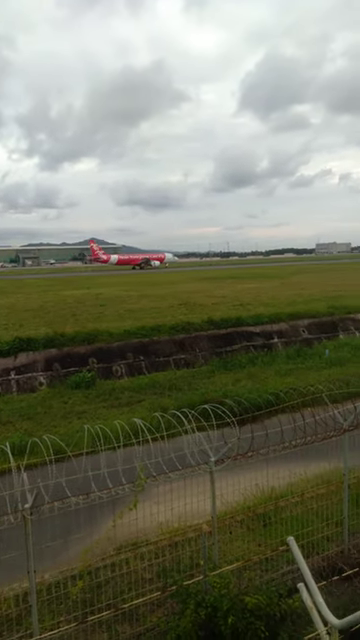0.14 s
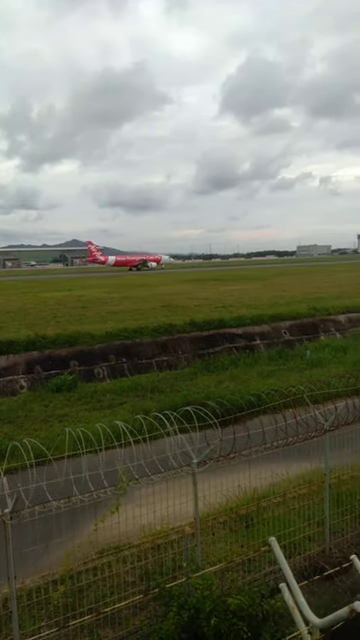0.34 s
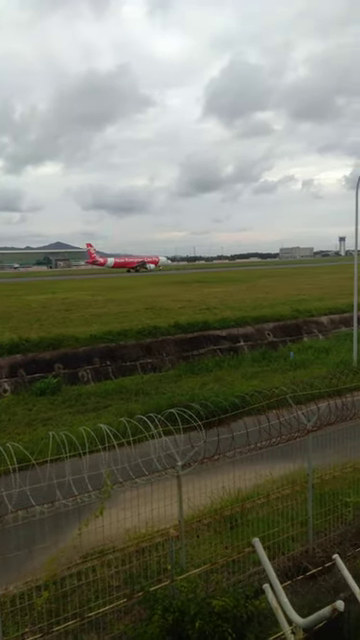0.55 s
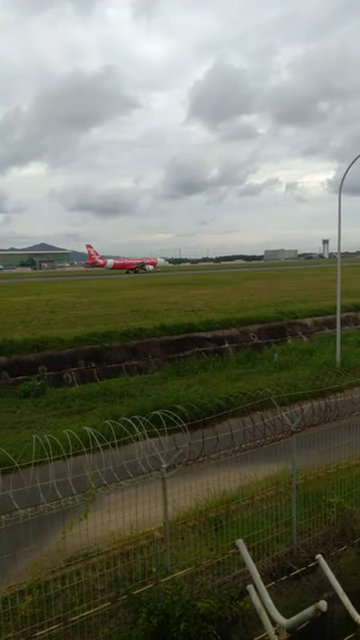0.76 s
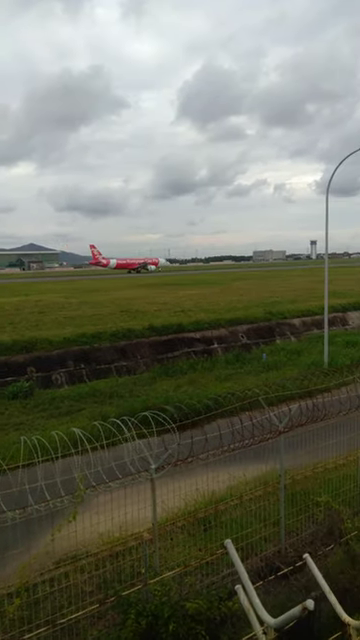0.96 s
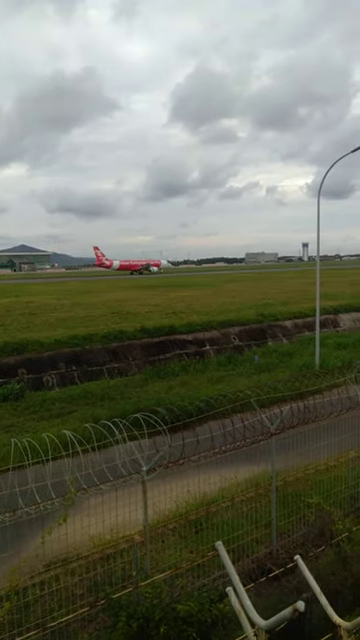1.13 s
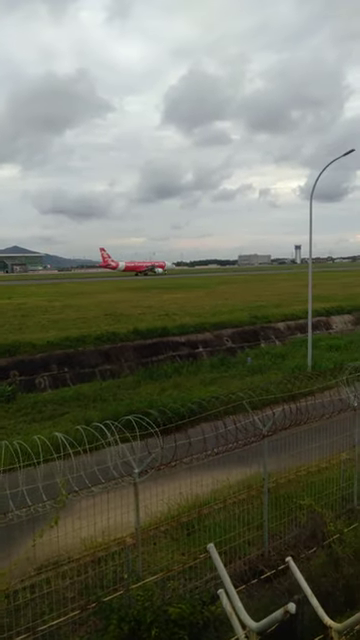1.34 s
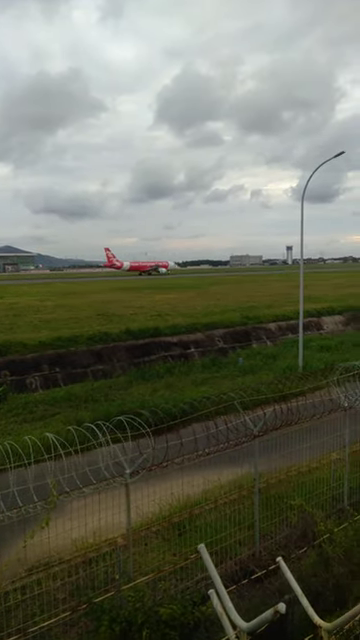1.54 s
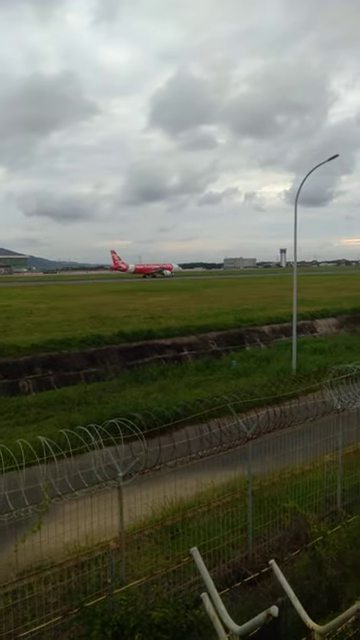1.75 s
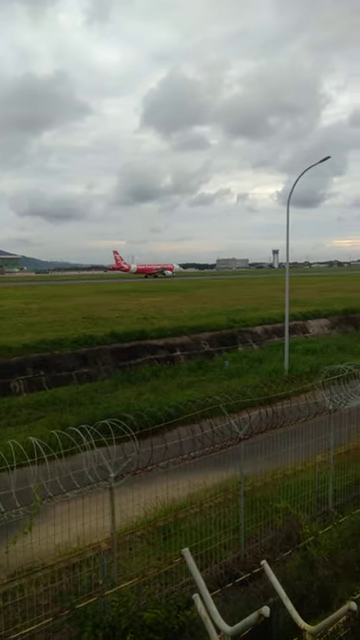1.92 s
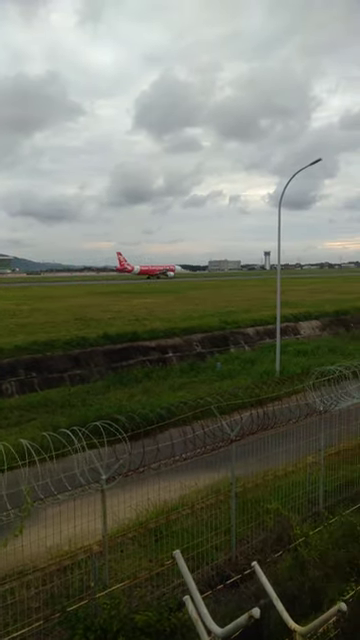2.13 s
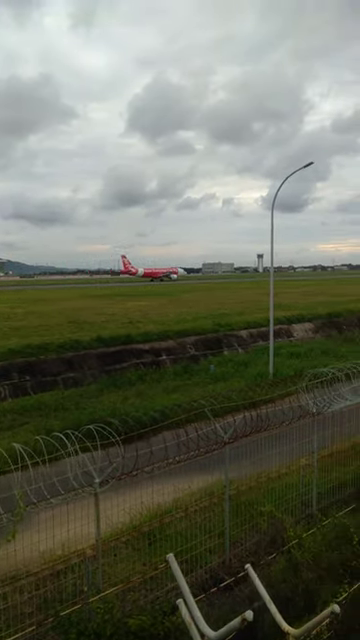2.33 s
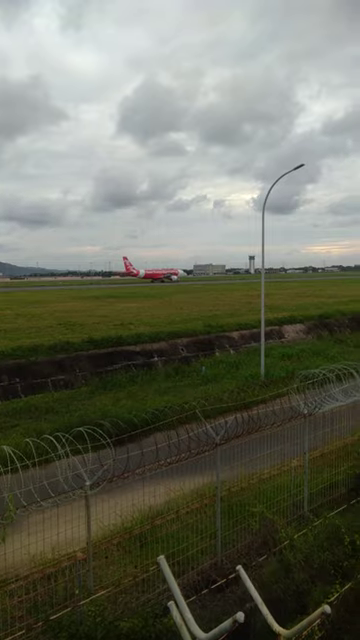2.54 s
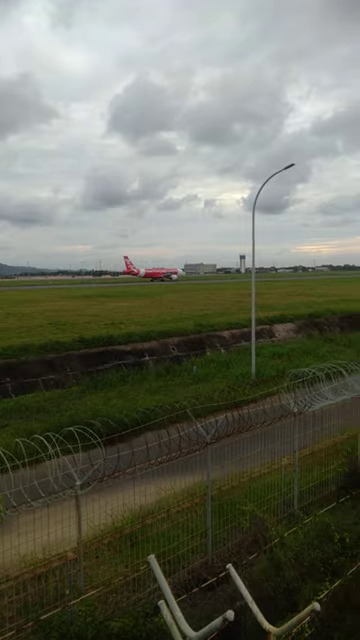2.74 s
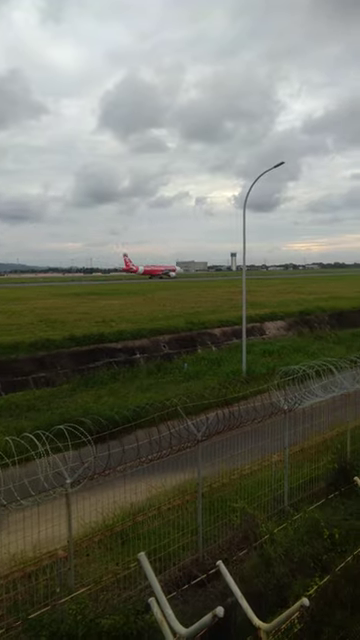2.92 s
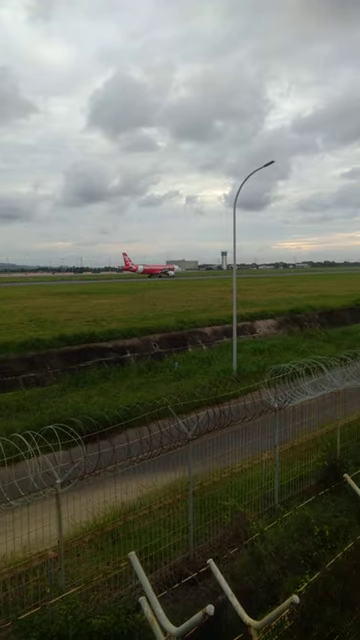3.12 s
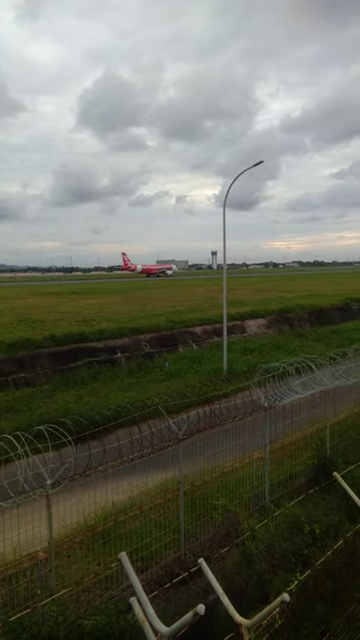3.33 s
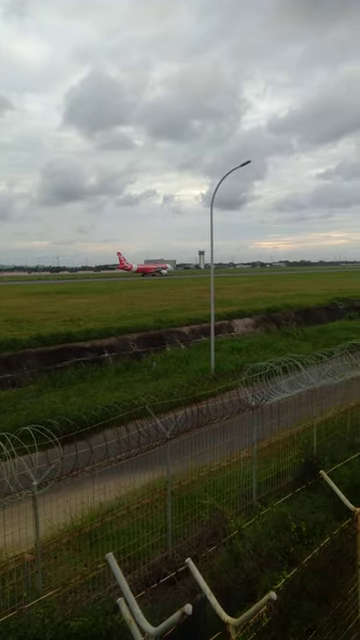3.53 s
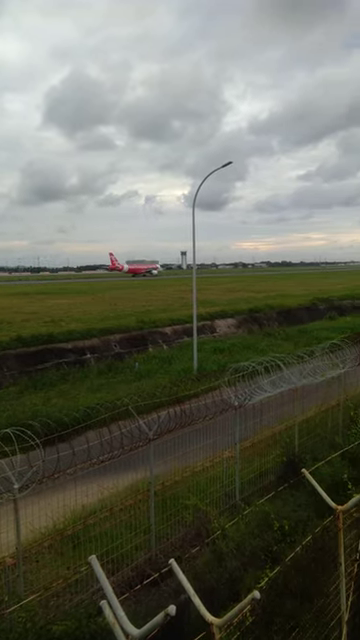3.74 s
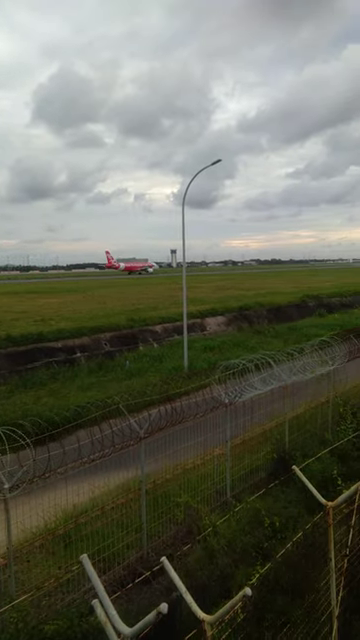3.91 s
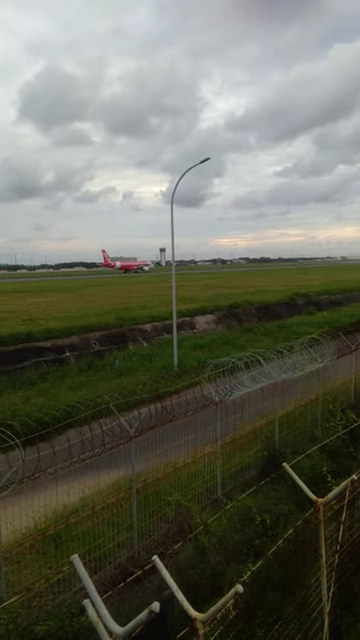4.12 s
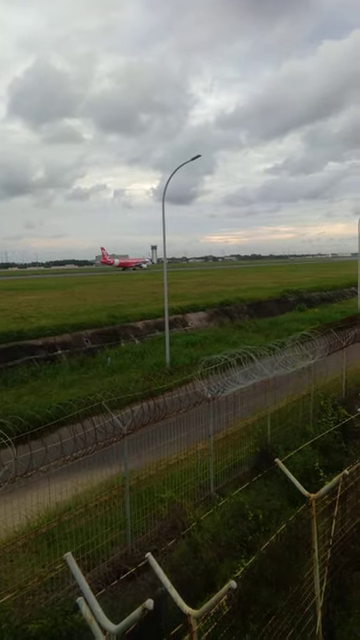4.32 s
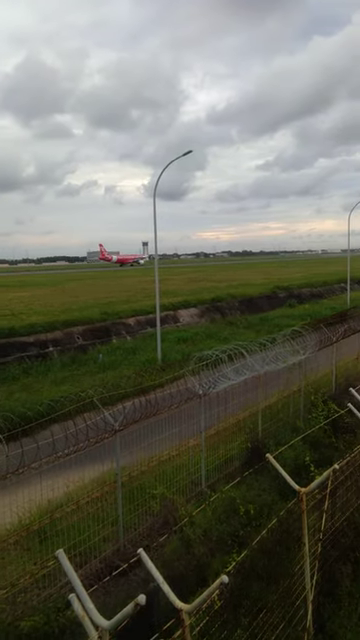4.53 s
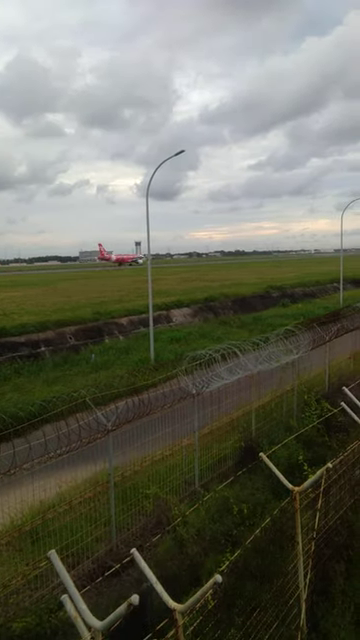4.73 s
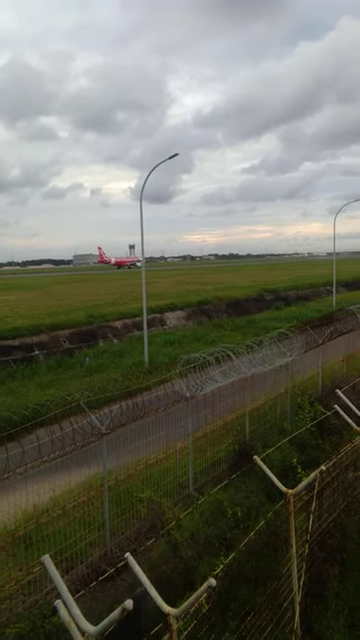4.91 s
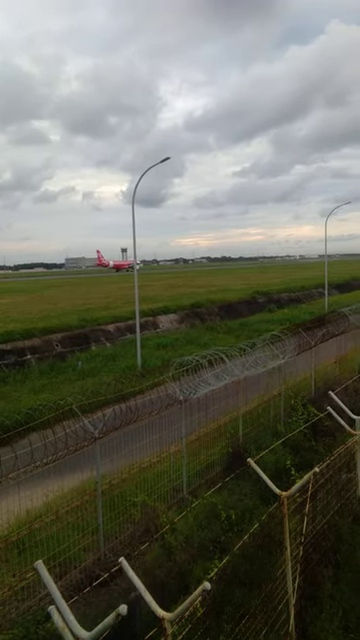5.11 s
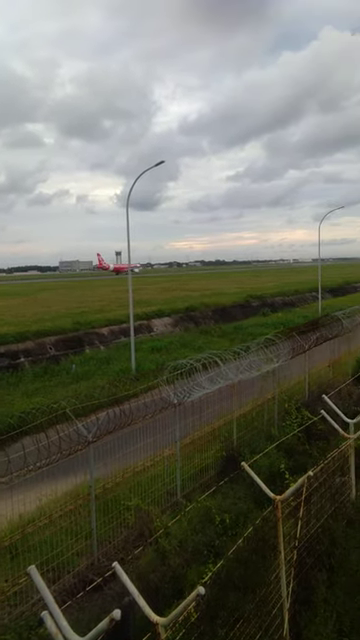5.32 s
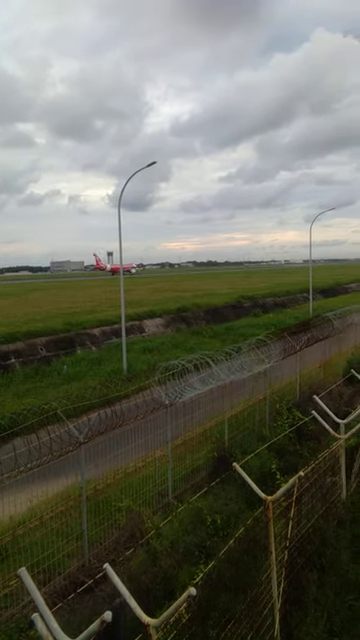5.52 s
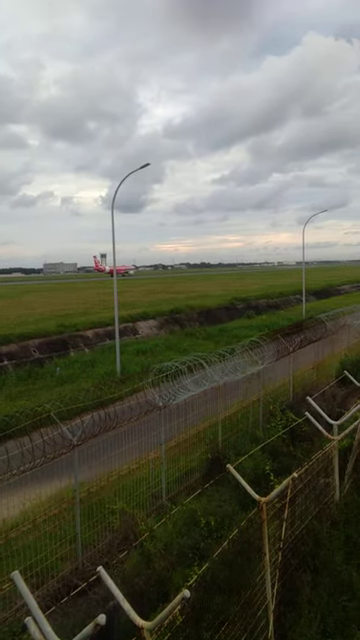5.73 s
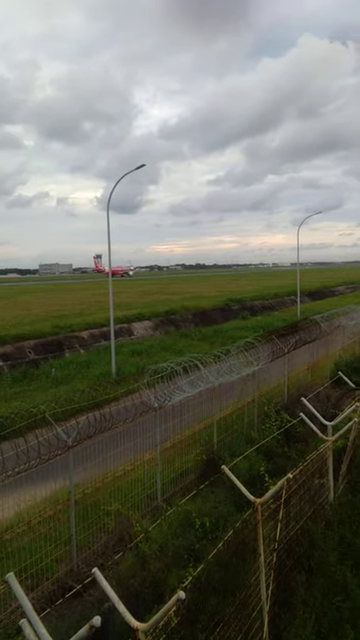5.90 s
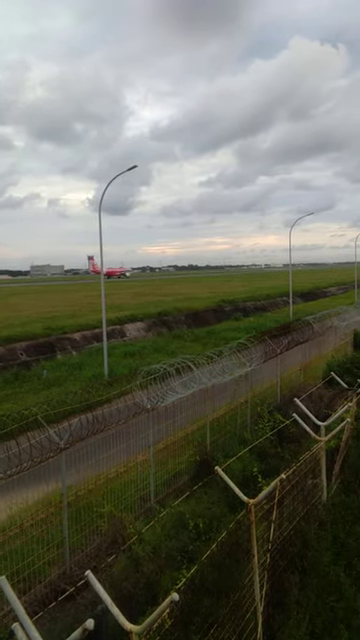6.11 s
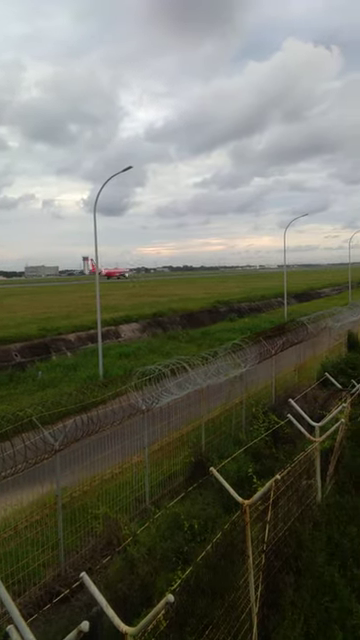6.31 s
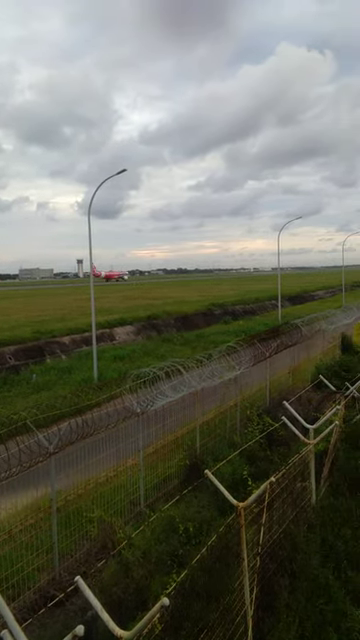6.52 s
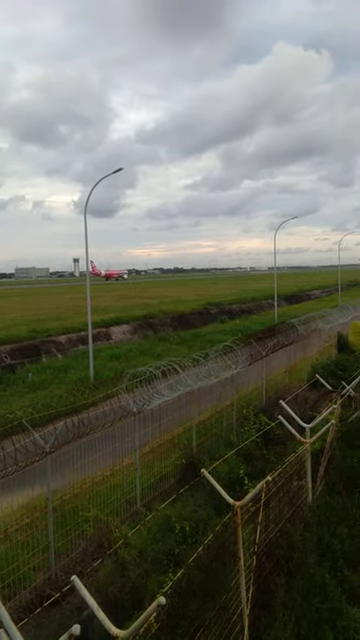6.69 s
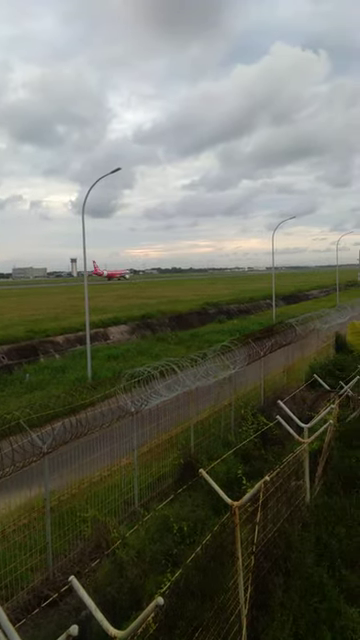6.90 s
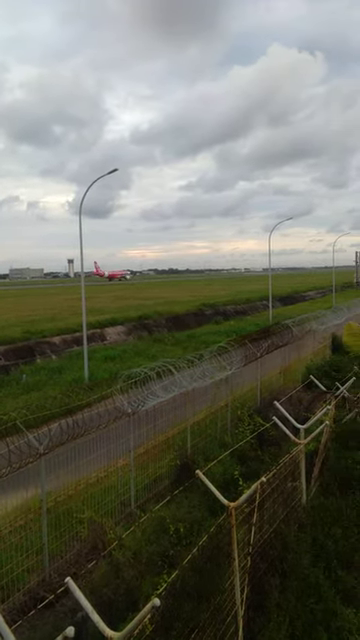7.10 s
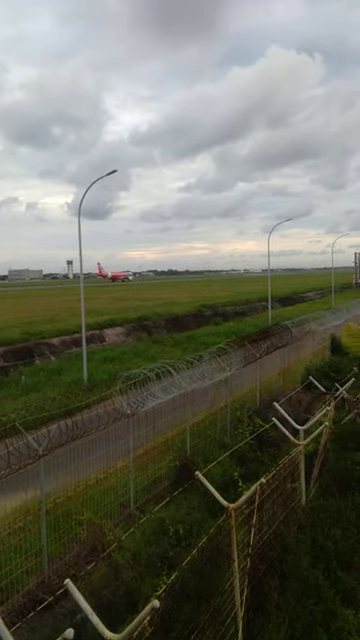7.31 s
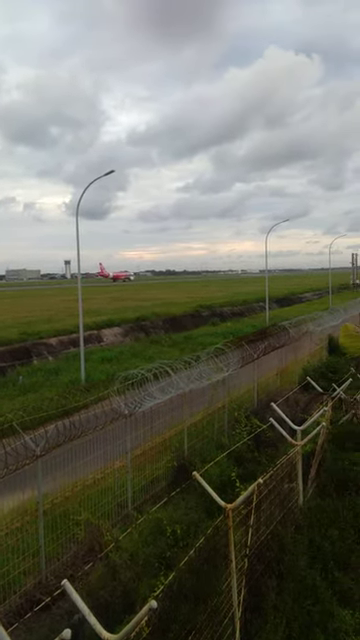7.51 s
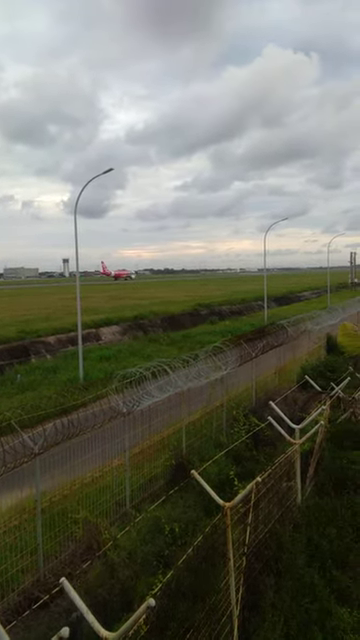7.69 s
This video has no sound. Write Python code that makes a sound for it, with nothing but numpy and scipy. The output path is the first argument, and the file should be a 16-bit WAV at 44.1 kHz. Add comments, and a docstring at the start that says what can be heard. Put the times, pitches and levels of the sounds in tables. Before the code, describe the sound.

Across an open airfield comes the steady roar and deep rumble of a faraway passenger jet on the ground. Engine hiss rises and falls in waves, and faint hollow howls come and go. The sound grows gradually quieter as the aircraft rolls away, its high whine dropping slightly in pitch. Brief, dull wind buffets hit the microphone several times along the way.

```python
"""Distant jet airliner on a runway.

Heard in mono from the airport fence as it rolls out. Exhaust eddies rumble and roar, fan hiss swells
on the wind, and narrow howls come and go. A turbine whine and a low hum sink in pitch as the aircraft
turns its tail and draws away. Now and then a gust buffets the microphone."""
import sys
import numpy as np
from scipy import signal
from scipy.fft import rfft, irfft, next_fast_len
from scipy.io import wavfile

SR = 44100
rng = np.random.default_rng(int(sys.argv[2]) if len(sys.argv) > 2 else 0)


def to_wav(sig):
    """Store sig (one row per channel, or 1-D mono) as 16-bit WAV at the path in sys.argv[1].

    Samples outside -1..1 are clipped; the rate is SR.
    """
    pcm = np.clip(np.atleast_2d(sig), -1, 1) * 32767
    pcm = np.round(pcm).astype(np.int16)
    wavfile.write(sys.argv[1], SR, pcm.T)  # frames by channels


N = 341775
TIME_S = np.arange(N) / SR

# Engine side heard. Each row: time in seconds, aspect (0 flank, 1 rear quarter, 2 tail).
ENGINE_ASPECT = [(0, 0.0), (1.6, 0.18), (2.7, 1), (4.0, 1.28), (5.0, 1.74), (6.2, 1.93), (7.75, 1.87)]
# Edges in Hz bounding the rumble, growl, roar, hiss, treble and air bands.
BAND_EDGES_HZ = [15, 270, 530, 1900, 4500, 10500, 17000]
# Fan swells. Each row: time in seconds, hiss in dB, treble in dB re hiss.
FAN_LEVELS = [(0.05, -27.5, -10), (0.7, -34.5, -8), (1.05, -31, -9), (1.3, -34.5, -9.5), (1.47, -31, -8.5),
              (1.68, -34.5, -7.5), (1.92, -32.5, -7.5), (2.7, -33.5, -7.5), (2.93, -28.5, -10.5),
              (3.4, -33.5, -11), (3.72, -33.5, -11.5), (4.35, -40.5, -6.5), (4.76, -37.5, -10),
              (4.95, -39.5, -10), (5.16, -34, -8.5), (5.52, -40, -11), (6.13, -37.5, -8),
              (6.23, -34.5, -9.5), (6.42, -34.5, -8.5), (6.55, -37, -10.5), (7.35, -42, -9.5),
              (7.75, -40.5, -11)]
# Fan hiss spectrum, rear quarter. Each row: frequency in Hz, relative density in dB.
FAN_HISS_QUARTER = [(1000, -43), (1700, -8), (1980, -5), (2410, -3.5), (2830, -0.5), (3330, 0.5),
                    (4590, -13), (5000, -15), (6500, -49), (11000, -120)]


def from_db(db):
    """Decibels to gain."""
    return 10 ** (np.asarray(db) / 20)


def in_time(rows):
    """Each column of a timed table, interpolated per sample."""
    times_s, *columns = np.transpose(rows)
    return [np.interp(TIME_S, times_s, column) for column in columns]


def swell(middle_s, length_s):
    """Gaussian rise and fall in gain; length_s spans two sigma."""
    return np.exp(-2 * ((TIME_S - middle_s) / length_s) ** 2)


def coloured(gain_at):
    """Unit-power noise with amplitude spectrum gain_at(hz)."""
    size = next_fast_len(N)
    hz = np.maximum(np.arange(size // 2 + 1) * SR / size, 1e-3)
    noise = irfft(rfft(rng.standard_normal(size)) * gain_at(hz), size)[:N]
    return noise / np.sqrt(np.mean(noise ** 2) + 1e-20)


def drift(rate_hz):
    """Random wander of unit spread, rolled off above rate_hz."""
    return coloured(lambda hz: 1 / (1 + (hz / rate_hz) ** 4))


def flutter(depth_db, rate_hz):
    """Gain flutter of a far sound, from eddies along the path."""
    return from_db(depth_db * drift(rate_hz))


def band_noise(spectrum, low_hz, high_hz):
    """Unit-power noise of a given spectrum between steep band edges."""
    points_hz, points_db = np.transpose(spectrum)

    def gain_at(hz):
        edge_loss = np.sqrt((1 + (low_hz / hz) ** 24) * (1 + (hz / high_hz) ** 24))
        return from_db(np.interp(np.log(hz), np.log(points_hz), points_db)) / edge_loss
    return coloured(gain_at)


def beamed(spectra, edges_hz):
    """Engine turbulence radiates a different colour each way: flank, rear quarter, tail."""
    aspect, = in_time(ENGINE_ASPECT)
    shares = [np.maximum(1 - np.abs(aspect - k), 0) for k in range(len(spectra))]
    return sum(np.sqrt(share) * band_noise(spectrum, *edges_hz)
               for share, spectrum in zip(shares, spectra))


def tone(hz):
    """Gliding sine of unit power."""
    return np.sqrt(2) * np.sin(2 * np.pi * np.cumsum(hz) / SR)


def breathy(hz, half_width_hz):
    """Narrow unit-power noise band, shifted onto a gliding pitch."""
    carrier_hz = SR / 4
    band = coloured(lambda f: 1 / (1 + (np.abs(f - carrier_hz) / half_width_hz) ** 3))
    analytic = signal.hilbert(band, next_fast_len(N))[:N]
    return np.real(analytic * np.exp(2j * np.pi * np.cumsum(hz - carrier_hz) / SR))


def engine_pitch(sink_from_s=2.2, sink_per_s=0.0224):
    """Pitch ratio of the engine tones: holds, then sinks as the aircraft turns its tail."""
    return 1 - sink_per_s * np.maximum(TIME_S - sink_from_s, 0)


def exhaust(growl_mean_db=-46, growl_follows=0.32):
    """Large eddies in the jet rumble; smaller ones growl and roar. All fade as it rolls away."""
    # Level curves. Each row: time in seconds, level in dB.
    rumble_levels = [(0, -29), (1.0, -30), (1.55, -28.5), (2.3, -29.5), (3.4, -33), (4.55, -35), (4.9, -38),
                     (5.5, -38), (6.25, -37.5), (6.55, -41), (6.8, -39), (7.75, -40)]
    roar_levels = [(0.05, -30.5), (0.45, -37.0), (1.3, -38.5), (1.43, -33.5), (1.68, -36.5), (2.4, -35),
                   (2.88, -33), (3.6, -39), (4.1, -39.0), (4.45, -42), (5.2, -42.5), (5.4, -44.5),
                   (5.95, -45.5), (6.35, -43), (7.3, -46.0), (7.75, -45)]
    # Spectra by side heard. Each row: frequency in Hz, relative density in dB.
    rumble_flank = [(12, -56), (20, -24), (32, -22), (73, -0.5), (118, 2.5), (178, 0.5), (247, -10),
                    (300, -11), (390, -52), (660, -120)]
    rumble_quarter = [(12, -57), (20, -23), (27, -27.5), (61, -7.5), (91, 0.5), (184, -4.5), (221, -8),
                      (259, -20.5), (300, -20.5), (390, -45), (660, -120)]
    rumble_tail = [(12, -65), (20, -32), (38, -22.5), (69, -3), (97, -9), (118, 0.5), (166, -5),
                   (182, -6.5), (300, -18), (390, -49.5), (660, -120)]
    growl_all_sides = [(140, -36), (230, 0), (422, -7.5), (519, -8), (600, 0.5), (780, -34), (1320, -120)]
    roar_flank = [(260, -44), (450, -7), (595, 1), (736, -0.5), (834, 1), (922, -9.5), (1070, -1),
                  (1240, -3), (1410, -4.5), (1520, -12.5), (1740, -3.5), (1940, -17.5), (2200, -14),
                  (2860, -36), (4840, -120)]
    roar_quarter = [(260, -44), (450, -4.5), (615, -0.5), (740, 1.5), (910, -8), (1060, 1.5), (1230, -0.5),
                    (1440, -4), (1510, -8.5), (1700, -12.5), (1980, -3.5), (2200, 6), (2860, -39),
                    (4840, -120)]
    roar_tail = [(260, -31), (450, -6), (500, -6), (702, 3), (886, -5.5), (1070, -1), (1330, -4),
                 (1610, -2.5), (1730, -12), (2000, -7), (2200, 10), (2860, -36), (4840, -120)]

    rumble_db, = in_time(rumble_levels)
    roar_db, = in_time(roar_levels)
    growl_db = growl_mean_db + growl_follows * (rumble_db - rumble_db.mean())
    rumble = beamed([rumble_flank, rumble_quarter, rumble_tail], BAND_EDGES_HZ[0:2])
    growl = band_noise(growl_all_sides, *BAND_EDGES_HZ[1:3])
    roar = beamed([roar_flank, roar_quarter, roar_tail], BAND_EDGES_HZ[2:4])
    lows = from_db(rumble_db - 0.5) * rumble + from_db(growl_db) * growl
    mids = from_db(roar_db - 0.5) * roar
    return lows * flutter(depth_db=0.1, rate_hz=10) + mids * flutter(depth_db=1.0, rate_hz=9)


def fans(air_mean_db=-36, air_follows=0.85):
    """Broad fan hiss swelling on the wind, with a narrow singing band pitched higher from behind."""
    # Spectra by side heard. Each row: frequency in Hz, relative density in dB.
    hiss_flank = [(1000, -45), (1700, -5), (1940, -6.5), (2100, -4.5), (2360, -5.5), (2670, -3.5),
                  (3110, -3), (3380, 1), (3760, -5), (4080, -5.5), (5000, -15.5), (6500, -47),
                  (11000, -120)]
    hiss_tail = [(1000, -43), (1700, 4), (2000, -17), (2340, -2.5), (2550, -5.5), (2870, -4.5),
                 (3020, -4.5), (3440, 0.5), (3710, -6), (3950, -6), (4170, -11), (5000, -15), (6500, -42),
                 (11000, -120)]
    treble_flank = [(2350, -36), (4000, -3), (5080, -8.5), (5370, -12.5), (6650, -6), (7050, -11.5),
                    (7670, -27), (8040, -23.5), (10500, -41), (17700, -120)]
    treble_quarter = [(2350, -32), (4000, 6), (4580, -9), (4970, -7), (5310, -13.5), (6520, -4),
                      (6970, -11.5), (7560, -22.5), (8040, -26), (10500, -41), (17700, -120)]
    treble_tail = [(2350, -35), (4000, 3), (4950, -9), (5220, -7.5), (5480, -9.5), (5780, -6.5), (6060, -4),
                   (6360, -7), (6950, -10.5), (7260, -19), (8040, -27.5), (10500, -36), (17700, -120)]
    air_all_sides = [(10000, 0), (11500, -9.5), (12400, -14), (13000, -18), (14000, -16), (15500, -15)]

    aspect, = in_time(ENGINE_ASPECT)
    hiss_db, tilt_db = in_time(FAN_LEVELS)
    treble_db = hiss_db + tilt_db
    air_db = air_mean_db + treble_db.mean() + air_follows * (treble_db - treble_db.mean())
    singing_hz = np.interp(aspect, [0, 2], [3320, 3480])
    singing_db = np.interp(aspect, [0, 2], [-13, -17])  # re hiss
    hiss = beamed([hiss_flank, FAN_HISS_QUARTER, hiss_tail], BAND_EDGES_HZ[3:5])
    treble = beamed([treble_flank, treble_quarter, treble_tail], BAND_EDGES_HZ[4:6])
    air = from_db(air_db) * band_noise(air_all_sides, *BAND_EDGES_HZ[5:7])
    singing = from_db(singing_db) * breathy(singing_hz, half_width_hz=50)
    treble *= from_db(treble_db - 0.65) * flutter(depth_db=0.86, rate_hz=16)
    body = from_db(hiss_db - 0.2) * (hiss + singing) * flutter(depth_db=0.64, rate_hz=13.5)
    return body + treble + air


def whine(start_hz=6470, smear=0.00419, flank_db=-22.5, tail_db=-8.5):
    """Turbine blade tone, smeared in pitch by the hot exhaust, clearest from behind; plus whistles."""
    # The tone rings out. Each row: middle in seconds, length in seconds, lift in dB.
    flares = [(5.1, .14, 5), (6.25, .35, 4.5), (7.57, 0.17, 12.5)]
    # Two breathy whistles below the whine, and its faint, diffuse octave.
    # Each row: start pitch in Hz, half width in Hz, level in dB re fan treble.
    whistle_bands = [(5020, 140, -16), (5720, 120, -14.5), (13050, 330, -50)]

    aspect, = in_time(ENGINE_ASPECT)
    hiss_db, tilt_db = in_time(FAN_LEVELS)
    pitch = engine_pitch()
    blade_db = flank_db + (aspect / 2) ** 2 * (tail_db - flank_db)  # re fan treble
    blade_db += sum(lift_db * swell(middle_s, length_s) for middle_s, length_s, lift_db in flares)
    blade_hz = start_hz * pitch * (1 + smear * drift(rate_hz=63.5))
    blade = from_db(blade_db) * tone(blade_hz) * flutter(depth_db=3.0, rate_hz=32)
    whistles = sum(from_db(level_db) * breathy(hz * pitch, half_width_hz)
                   for hz, half_width_hz, level_db in whistle_bands)
    return from_db(hiss_db + tilt_db) * (blade + whistles)


def microphone_hiss(level_db=-83):
    """Faint white self-noise of the microphone."""
    return from_db(level_db) * rng.standard_normal(N)


def buffets(decay_cycles=0.8, length_s=0.05, band_hz=(90, 700)):
    """Each eddy gives the microphone one short, dull push and pull, without deep bass."""
    # Each row: start in seconds, envelope peak before filtering in dB, pitch in Hz.
    eddies = [(0.022, -22, 137), (0.497, -14, 131), (2.018, -21, 153), (2.035, -15.5, 166),
              (2.073, -15, 120), (4.621, -21, 150), (4.635, -23, 150), (4.649, -18, 380), (4.669, -33, 190),
              (4.693, -24, 198), (5.442, -23.5, 151), (5.885, -25.5, 140), (7.252, -23, 161)]
    out = np.zeros(N)
    for start_s, peak_db, hz in eddies:
        active = (TIME_S >= start_s) & (TIME_S < start_s + length_s)
        cycles = (TIME_S[active] - start_s) * hz
        envelope = from_db(peak_db) * np.exp(-(cycles / decay_cycles) ** 2 / 2)
        out[active] += envelope * np.sin(2 * np.pi * cycles)
    return signal.sosfilt(signal.butter(3, band_hz, "band", fs=SR, output="sos"), out)


def howls():
    """Narrow hollow howls in the engine noise, each swelling and fading."""
    # Each row: middle in seconds, length in seconds, pitch in Hz, half width in Hz, level in dB.
    howl_bands = [(0.8, .6, 1180, 130, -40.5), (2.002, 1.5, 752, 74, -46), (2.3, 0.62, 3457, 45, -38),
                  (2.855, 0.27, 1250, 54, -42), (4.1, 1.1, 620, 10, -48), (4.25, 3.1, 1184, 76, -51),
                  (4.9, 0.92, 2810, 86, -44), (5.2, 0.38, 1080, 65, -55), (5.2, 1.6, 4700, 70, -60),
                  (5.9, 1.2, 5320, 85, -59), (7.4, 0.75, 3480, 55, -50)]
    out = np.zeros(N)
    for middle_s, length_s, hz, half_width_hz, level_db in howl_bands:
        band = coloured(lambda f: 1 / (1 + ((f - hz) / half_width_hz) ** 2))
        out += from_db(level_db) * swell(middle_s, length_s) * band
    return out


def gusts(low_hz=70, split_hz=250, high_hz=510):
    """Turbulent wind churns briefly at the microphone: a rumble and a growl above it."""
    # Each row: middle in seconds, length in seconds, rumble in dB, growl in dB.
    spells = [(0.56, .1, -37, -55), (1.502, 0.19, -36.5, -53), (2.04, .07, -34.5, -41),
              (3.19, .035, -37, -43), (3.832, .03, -33, -50), (4.183, 0.048, -31, -47),
              (4.648, 0.036, -30.5, -32.5), (4.706, 0.056, -34.5, -49)]
    rumble = coloured(lambda hz: 1 / (1 + (low_hz / hz) ** 6 + (hz / split_hz) ** 6))
    growl = coloured(lambda hz: 1 / (1 + (split_hz / hz) ** 6 + (hz / high_hz) ** 6))
    return sum(swell(middle_s, length_s) * (from_db(rumble_db) * rumble + from_db(growl_db) * growl)
               for middle_s, length_s, rumble_db, growl_db in spells)


def hum(start_hz=172.5, waver=0.0017):
    """Low engine tone that surfaces from the rumble now and then."""
    # Each row: middle in seconds, length in seconds, level in dB.
    rises = [(.95, 0.4, -36), (5.548, 0.68, -37.5), (7.62, 0.54, -37.5)]
    gain = sum(from_db(level_db) * swell(middle_s, length_s) for middle_s, length_s, level_db in rises)
    return gain * tone(start_hz * engine_pitch() * (1 + waver * drift(rate_hz=6.0)))


def jet_rasp(middle_s=2.51, length_s=0.016, level_db=-31):
    """One short burst of engine hiss."""
    hiss = band_noise(FAN_HISS_QUARTER, *BAND_EDGES_HZ[3:5])
    return from_db(level_db) * swell(middle_s, length_s) * hiss


def scene():
    """Far aircraft and near wind, identical in both channels."""
    aircraft = exhaust() + fans() + howls() + jet_rasp() + whine() + hum()
    mono = aircraft + gusts() + buffets() + microphone_hiss()
    return np.array([mono, mono])


def record(dry):
    """Steep elliptic low-pass."""
    cutoff_hz = 15400
    return signal.sosfilt(signal.ellip(10, 0.1, 80, cutoff_hz, fs=SR, output="sos"), dry)


dry = scene()
out = record(dry)
to_wav(out)
```